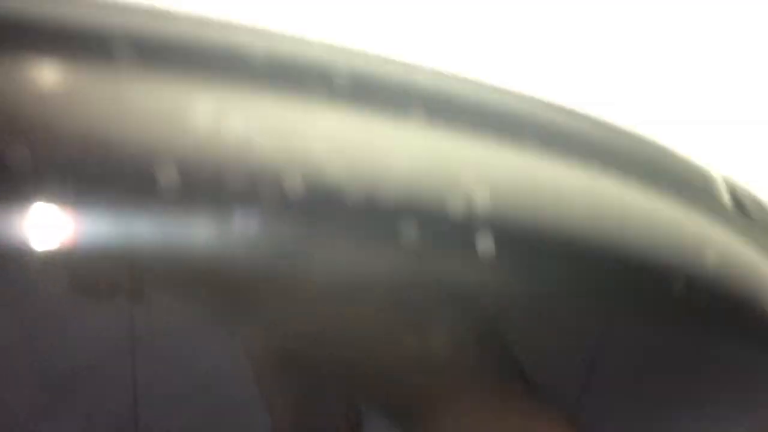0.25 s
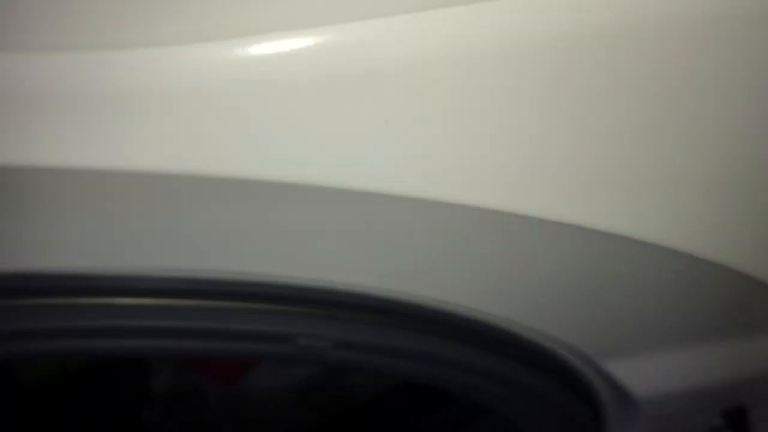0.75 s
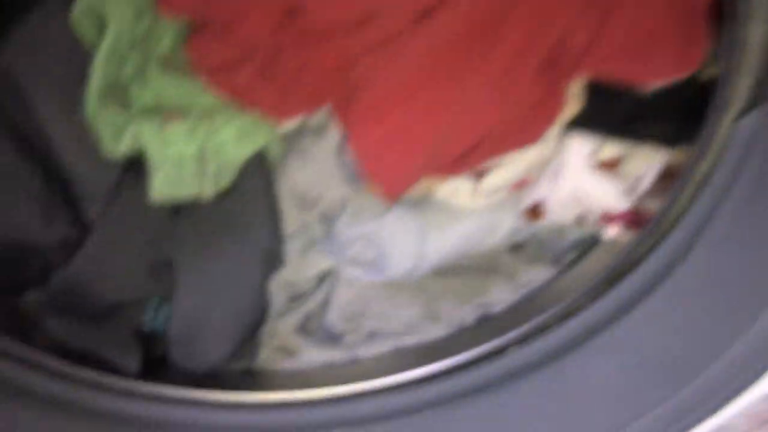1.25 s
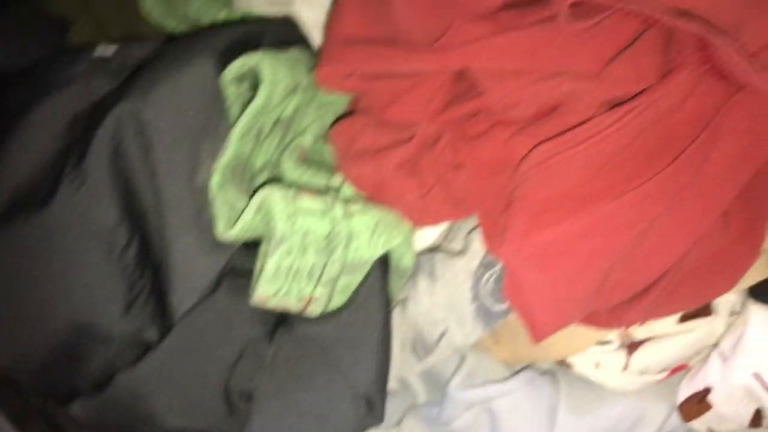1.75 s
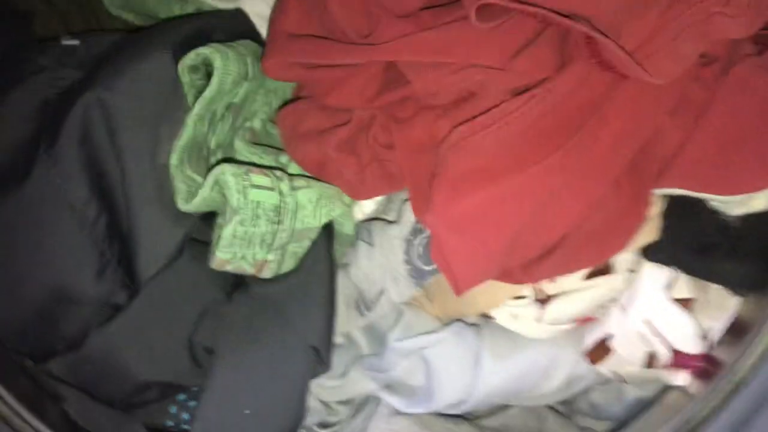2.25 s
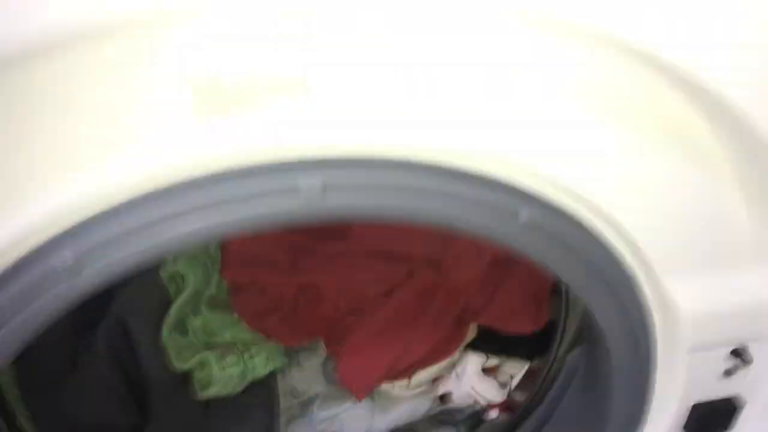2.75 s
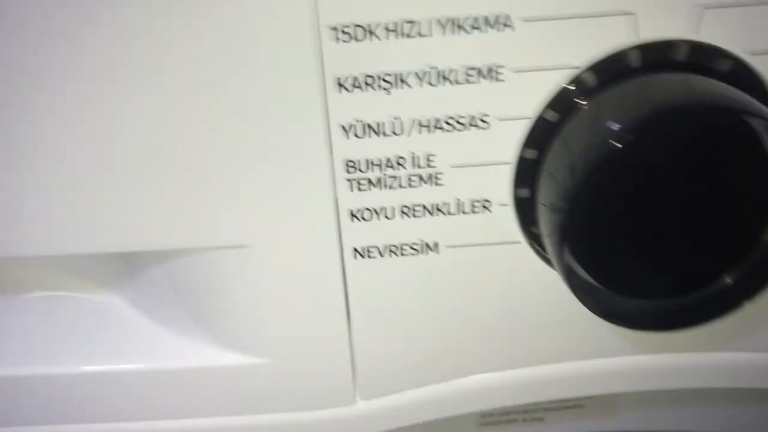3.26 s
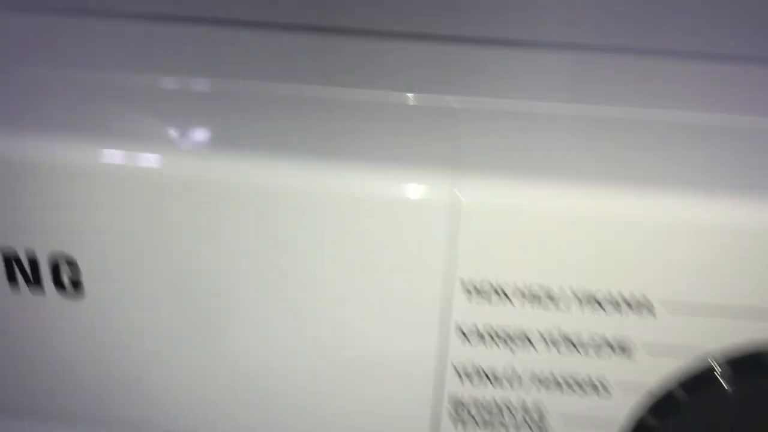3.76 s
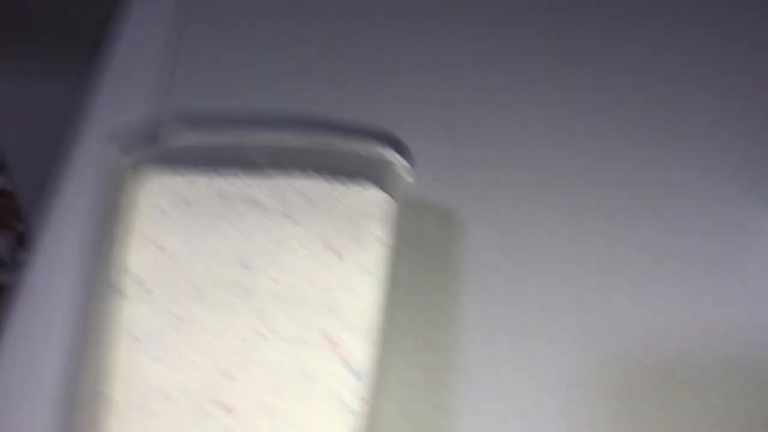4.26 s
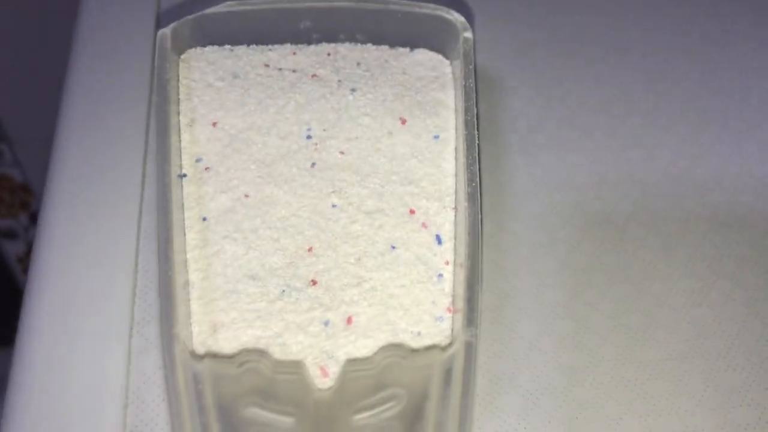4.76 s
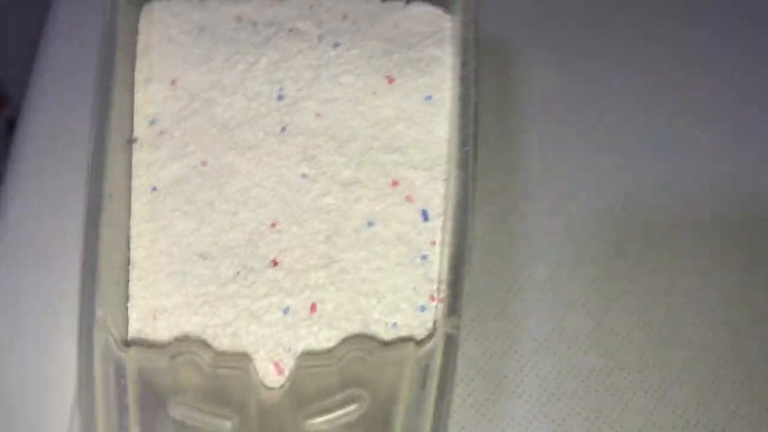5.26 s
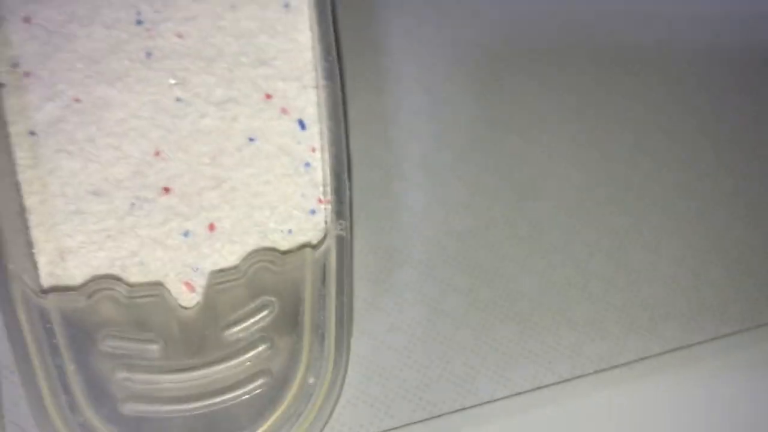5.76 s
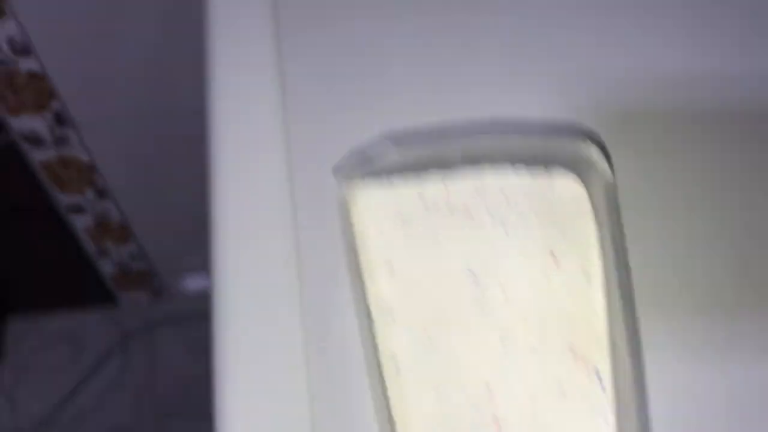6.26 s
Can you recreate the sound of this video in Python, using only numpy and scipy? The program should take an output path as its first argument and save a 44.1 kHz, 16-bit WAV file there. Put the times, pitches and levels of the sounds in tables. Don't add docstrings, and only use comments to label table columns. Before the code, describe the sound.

One close mono microphone catches light latch clicks, a brief rubbery creak and a loud hollow slam whose ring fades off tiles. A near-quiet stretch holds tiny ticks, cloth rustle and very faint hinge squeaks. Then a door thunk and a sharper shut, a cluster of hollow plastic knocks on resonant sheet metal, grainy powder whispers, and one firm bump before quiet.

```python
import sys
import numpy as np
from scipy import signal
from scipy.fft import rfft, irfft, next_fast_len
from scipy.io import wavfile
from scipy.ndimage import uniform_filter1d, map_coordinates

SR = 44100
rng = np.random.default_rng(int(sys.argv[2]) if len(sys.argv) > 2 else 0)


def generate_wav(sig):
    pcm = np.round(np.clip(np.atleast_2d(sig).T, -1, 1) * 32767).astype(np.int16)
    wavfile.write(sys.argv[1], SR, pcm)


def boost(x):
    u = np.asarray(x, float) / 20
    return 10 ** u


N = 286650

# (time [s], crack peak [dB], air re crack [dB], knock re crack [dB], knock pitch [Hz])
LATCH_CONTACTS = [(0.0164, -45, -3, 6.5, 687), (0.1689, -39, -17.5, 7.5, 900),
                  (0.2064, -48.5, -7.5, 2.5, 918), (0.2574, -58, -5.5, -7, 769),
                  (0.3042, -31.5, -8.5, -9, 1380), (0.306, -42, -17.5, 11.5, 715),
                  (0.4552, -42.5, -5.5, 3, 887), (0.481, -20.5, -10.5, -6, 659.5),
                  (0.5088, -35.5, 0, -3.5, 783), (0.528, -38, -6, -7, 942), (0.5455, -16, -19.5, -1.5, 670),
                  (0.5567, -29, -25.5, 7.5, 680), (0.581, -37, -16, 4.5, 821), (0.6065, -14, -5, -9, 858),
                  (0.6157, -7, -8.5, -5.5, 601), (0.6215, -12, -8.5, 5.5, 854.5),
                  (0.6314, -21, -19, 12.5, 802.7)]
# (time [s], crack [dB], air [dB], knock [dB], knock pitch [Hz])
TICK_CONTACTS = [(1.1364, -52, -6, 2, 670), (1.235, -60, -4, 12.5, 641), (1.4844, -61.5, 1, 11, 588.7),
                 (2.3156, -54.5, -10.5, -3, 932), (2.358, -57.5, -14, 5.5, 1218),
                 (2.3614, -61.5, -12.5, 9, 900), (2.366, -63.5, -12.5, 8, 640),
                 (2.5162, -53, -15.5, -18, 1101), (2.7467, -51, -13, -12, 761),
                 (2.7576, -47.5, -16.5, -24.5, 988), (2.9208, -50.5, 4.5, -10, 1500),
                 (3.2545, -47, -26.5, -19, 678), (4.1535, -45, -17.5, -22, 693)]
# (time [s], crack [dB], air [dB], knock [dB], knock pitch [Hz])
DOOR_CONTACTS = [(3.4027, -44.5, -3, 4, 1350), (3.4243, -53, -28, 4.5, 1710), (3.4463, -52, -3.5, 11, 1090),
                 (3.471, -26.5, -19.5, 7, 1020), (3.476, -36, -17.5, 14, 780), (3.5044, -35, -18, 7.5, 765),
                 (3.6292, -44, -16, 16.5, 890), (3.6606, -23, -12.5, -24.5, 1085),
                 (3.6652, -9, -6.5, -13.5, 1300), (3.6732, -14.5, -22.5, 2, 770),
                 (3.6832, -11.5, -26.5, -9, 990), (3.6874, -21.5, -17, 13.5, 750)]
# (time [s], crack [dB], air [dB], knock [dB], knock pitch [Hz])
SCOOP_CONTACTS = [(4.2472, -31, -14.5, 0, 1016), (4.2626, -29.5, -6.5, -3, 770),
                  (4.341, -45, -24.5, 3.5, 842), (4.3869, -41.5, -11, -1.5, 820), (4.3992, -53, -9, 9, 806),
                  (4.5467, -40.5, -18, 4.5, 880), (4.578, -35, -8.5, -6.5, 900),
                  (4.6128, -49.5, 1, -13.5, 800), (4.6434, -43.5, -7, -17, 933),
                  (4.6738, -45, -14, -7, 873), (4.6962, -30, -2, -0.5, 845), (4.7129, -27.5, -1, -2, 860),
                  (4.7264, -46, -17, 14, 824), (4.7724, -28, -13, 11, 693), (4.791, -17.5, -9, 3, 890),
                  (4.811, -40, -17.5, 18.5, 925)]
# (time [s], crack [dB], air [dB], knock [dB], knock pitch [Hz])
SLIDE_CONTACTS = [(5.1457, -38.5, -11.5, -1.5, 1040), (5.328, -47.5, -9.5, -2.5, 1224),
                  (5.3982, -52, -24, 2, 799), (5.4235, -50, -24, -3, 1700), (5.4925, -53, -17, 14.5, 920),
                  (5.5205, -19, -43, 5.5, 980), (5.697, -39.5, -8, -19, 994),
                  (6.119, -48.5, -4.5, -9, 1500), (6.1332, -64.5, 0, -2, 671)]
# (time [s], crack [dB], air [dB], knock [dB], knock
# pitch [Hz])
CHATTER_CONTACTS = [(0.3025, -40, -10.5, -11, 910), (0.376, -52.5, -11, 0.5, 910),
                    (0.385, -51, -12, 5.5, 905), (0.3965, -48.5, -11, 1, 980), (0.4045, -50, -11, 5, 1280),
                    (0.4068, -41.5, -12.5, 8.5, 726), (0.413, -43, -12.5, 7, 780),
                    (0.4305, -48, -10.5, 3.5, 850), (0.435, -43, -11.5, 1.5, 980),
                    (0.442, -42, -11, 4.5, 840), (0.4795, -39, -10, -2.5, 1400),
                    (0.5445, -32, -10.5, -9.5, 701), (3.4045, -49, -16, 13.5, 610),
                    (4.7035, -35.5, -12, 8, 1500), (4.7085, -41.5, -15, 7, 1580),
                    (4.7895, -26.5, -22, 0, 1700), (5.322, -51, -16, 6, 1130), (5.5165, -36, -20.5, 2, 916),
                    (5.525, -30.5, -35, 10, 900), (4.548, -49.5, -18.5, 5.5, 1480),
                    (4.7265, -33, -15, -3, 900), (0.1735, -46.5, -20, 10.5, 890),
                    (0.419, -47.5, -13.5, 0.5, 850), (3.6665, -24, -32.5, 10.5, 804)]
# (centre [Hz], width [Hz], level [dB])
LATCH_CRACK = [(1430, 140, 2.5), (2300, 480, -4), (3330, 470, -1.5), (4190, 260, 4.5), (6460, 2600, -3)]
# (centre [Hz], width [Hz], level [dB])
TICK_CRACK = [(4050, 980, 0), (5650, 700, 0.5), (7480, 1500, -4)]
# (centre [Hz], width [Hz], level [dB])
DOOR_CRACK = [(1500, 190, -1.5), (2052, 500, -4.5), (2720, 950, -4.5), (4430, 390, -2), (6120, 1750, -6.5)]
# (centre [Hz], width [Hz], level [dB])
SCOOP_CRACK = [(1490, 110, -0.5), (2250, 450, 0), (3200, 860, -1), (4310, 720, -1), (6530, 2030, -10)]
# (centre [Hz], width [Hz], level [dB])
TOUCH_CRACK = [(1480, 300, 0.5), (2659, 380, 2), (3300, 400, 2.5), (4285, 800, -1.5), (6500, 2300, -9)]
# (centre [Hz], width [Hz], level [dB])
AIR_MODES = [(7950, 3400, 1), (12590, 4600, -1.5), (15000, 1300, -0.5)]
# (multiple of knock pitch [1], width [Hz], level [dB])
HOLLOW_MODES = [(1, 97, 8.5), (1.65, 640, -11), (.62, 660, -10.5)]
# (time [s], peak [dB], strongest mode [Hz], ring scale of that mode [s])
PANEL_THUDS = [(0.015, -64.5, 245, 0.021), (0.306, -37.5, 323, 0.02), (0.483, -25, 340, 0.013),
               (0.55, -29, 330, 0.03), (0.61, -20.5, 252, 0.013), (0.696, -36, 216, 0.016),
               (1.498, -49.5, 287, 0.024), (1.825, -60.5, 295.2, 0.012), (2.049, -57.5, 237, 0.018),
               (2.358, -64.5, 242.7, 0.015), (3.402, -36, 193.7, 0.035), (3.403, -36.5, 413, 0.021),
               (3.478, -30, 188, 0.04), (3.512, -33.5, 190, 0.022), (3.572, -35.5, 170, 0.02),
               (3.616, -42, 175, 0.02), (3.685, -19.5, 246, 0.02), (4.256, -33.5, 210, 0.017),
               (4.358, -41, 233, 0.029), (4.702, -22.5, 310, 0.025), (4.724, -23.5, 261, 0.018),
               (4.768, -24.5, 300, 0.013), (4.7924, -17, 260, 0.012), (5.326, -34.5, 250, 0.013),
               (5.402, -37, 268, 0.026), (4.81, -28.5, 397, 0.023), (5.5193, -17.5, 240, 0.012),
               (6.117, -45, 212, 0.012)]
# (centre [Hz], width [Hz], level [dB])
PANEL_MODES = [(132, 240, -7.5), (215, 60, 3), (245, 59, -2.5), (280.9, 85, -5), (334, 51, -2),
               (386, 72, -2)]
# (frequency [Hz], t60 [s])
TILES_T60 = [(100, 0.99), (300, 0.96), (1000, 0.84), (3000, 0.94), (4500, 0.82), (6500, 0.68), (9000, .45),
             (12000, 0.47), (15000, .28)]
# (frequency [Hz], level [dB])
TILES_COLOUR = [(100, 9.5), (300, 5), (520, 4), (950, -1.5), (1700, -0.5), (3000, -1), (4400, -2),
                (6000, -2), (10000, 0.5), (15000, 0)]
# (frequency [Hz], density [dB per Hz])
QUIET_SPECTRUM = [(15, -43.5), (25, -8.5), (53, -4), (76, -7.5), (172, -15), (220, -27), (304, -18),
                  (378, -22), (568, -29.5), (616, -29.5), (978, -29.5), (2670, -34.5), (3150, -34),
                  (15200, -33), (16500, -47)]
# (frequency [Hz], amplitude [dB])
MOTOR_HUM = [(166.9, -75), (247.6, -76), (581.4, -81), (667.5, -87.5), (995.9, -86.5), (1420, -87.5)]
# (time [s], level [dB])
DOOR_SWING = [
    (0, -66),
    (.074, -91),
    (.11, -79),
    (.27, -70.5),
    (.44, -65),
    (.53, -40),
]
# (time [s], centre [Hz], width [Hz], level [dB rms], t60 [s])
BUZZ = [(0.85, 4100, 200, -36, .06), (0.547, 700, 100, -32, 0.12), (0.625, 4100, 300, -47, .85),
        (0.625, 1400, 150, -42.5, 0.55), (0.17, 2300, 810, -46.5, 0.093), (3.1, 5000, 120, -60.5, 0.19),
        (3.473, 1300, 250, -44, 0.2), (3.475, 1200, 100, -45, .25), (3.476, 780, 60, -42.5, .35),
        (3.686, 930, 100, -33, .25), (4.772, 1300, 530, -29, .08), (4.791, 1600, 390, -35.5, 0.23),
        (5.524, 930, 130, -46, 0.63), (4.8, 265, 170, -48, 0.99), (5.69, 5700, 900, -59, .1),
        (3.8, 730, 38, -41, 0.18), (3.69, 400, 40, -36.5, 0.57), (3.7, 1000, 70.6, -40, .15),
        (3.7, 740, 50, -42, .4), (0.557, 6900, 500, -46, .04), (0.571, 6900, 500, -48, .04),
        (0.581, 6900, 500, -46, .04), (4.808, 1000, 220, -31, .04), (6.12, 330, 110, -55.5, .45),
        (5.552, 8800, 700, -59, 0.0395)]
# (frequency [Hz], level [dB], t60 [s])
DRUM_MODES = [(54.4, -17, 1.7), (61.6, 0.5, 0.11), (121.7, -14.5, 0.42), (172.3, -32, 1.4),
              (230, -23, 0.73)]
# (frequency [Hz], level [dB], t60 [s])
FRONT_MODES = [(51.9, -8, 1.04), (75.4, -10, 1.67), (117.2, -2.5, 0.86), (190, -18.5, 0.35),
               (240, -24.5, 0.67), (363, -11.5, 0.82)]
# (frequency [Hz], level [dB], t60 [s])
LID_MODES = [(58.7, -11.5, 0.91), (74.9, -22.5, 0.52), (80.9, -12, 1.29), (145, -19.5, 1.03),
             (196, -5.5, 0.39), (209.8, -2.5, 0.32), (279, -10.5, 0.59), (271.6, -2, 0.38), (304, -7, 0.75),
             (337, -9, 0.4)]
# (time [s], level [dB], favoured mode [Hz], loss off it [dB/octave^2], free ring [s])
DRUM_BLOWS = [
    (0.555, -31.5, 57.23, 8, 3),
    (0.629, -10, 80.36, -1, 0.77),
]
# (time [s], level [dB], favoured mode [Hz], loss off it [dB/octave^2], free ring [s])
FRONT_BLOWS = [
    (2.071, -54, 69.6, 18, .2),
    (3.41, -35.5, 57.6, 8.4, 3),
    (3.478, -30.5, 63, 9, 3),
    (3.69, -25.5, 110, 0.78, 3),
    (4.274, -53, 68, 34, 3),
]
# (time [s], level [dB], favoured mode [Hz], loss off it [dB/octave^2], free ring [s])
LID_BLOWS = [
    (4.666, -25.5, 50, 19, 3),
    (4.792, -20.5, 145, 2, 3),
    (5.329, -42.5, 268, 8.7, 3),
    (5.523, -25.5, 168, 4.1, 3),
    (6.121, -56, 337, 9.1, 3),
    (6.18, -49, 54.6, 19.7, 3),
]
# (time [s], frequency [Hz], level [dB], t60 [s], free ring [s])
SINGLE_RINGS = [(0.29, 100, -49, 0.43, 3), (0.559, 92.5, -22, 0.67, 3), (0.62, 95, -8, 0.1, 2.6),
                (1.291, 91, -40.5, 0.068, 3.6), (0.647, 64.4, -28, .55, 3), (0.69, 216, -36, .4, 3),
                (1.495, 55, -53, 1.5, 0.08), (1.675, 56, -58.5, .7, 3.07), (6.12, 188.1, -54, .3, 2.94),
                (5.402, 259, -36, 0.13, .012), (5.424, 340, -37, .16, 3), (5.326, 263, -34, .2, .012),
                (5.66, 54, -46, 1.06, 3.2), (3.477, 95, -17.5, 0.14, 3), (3.687, 95, -13, 0.34, 0.12),
                (5.519, 100, -34.5, 0.6, 3), (6.128, 95, -50, 0.28, 3.4)]
# (time [s], level [dB])
SEAL_CREAK = [(.36, -81.5), (.378, -58), (.398, -51), (.41, -46.5), (.424, -53), (.438, -44), (.45, -53),
              (.47, -55)]
# (centre [Hz], width [Hz], level [dB])
SEAL_MODES = [(786, 150, 7.5), (1400, 260, 0), (2760, 390, -2), (3900, 900, -6), (6370, 1700, -31)]
# (peak time [s], rise [s], fall [s], level [dB], lowest frequency [Hz])
POWDER_SWELLS = [(.40, .034, 0.025, -59, 4900), (.44, 0.0096, 0.0066, -58, 5000),
                 (1.15, 0.027, 0.13, -64, 4860), (2.6, 0.2, 0.41, -83, 3985),
                 (2.94, 0.011, 0.094, -63.5, 5010), (4.74, 0.062, .15, -78.5, 8000),
                 (5.02, 0.13, 0.031, -67, 8900), (5.17, 0.27, 0.33, -67, 5800),
                 (5.47, 0.019, 0.11, -65, 3900), (5.68, .048, 0.067, -65, 7100)]
# (peak time [s], rise [s], fall [s], level [dB], lowest frequency [Hz])
CLOTH_SWELLS = [(1.2, .1, .12, -66, 458.7), (1.51, 0.026, 0.05, -65.5, 249.3),
                (2.42, 0.039, 0.084, -73, 703), (2.93, 0.034, 0.21, -71, 497),
                (3.28, 0.029, 0.15, -69.5, 2150), (4.73, 0.032, 0.035, -43, 437),
                (5.69, 0.0076, 0.02, -54.5, 1495), (5.34, 0.013, .03, -65, 600),
                (5.41, .012, 0.035, -64, 600), (5.48, .03, 0.038, -69, 900)]
# (peak time [s], half length [s], level [dB], pitch [Hz])
HINGE_SQUEAKS = [(1.985, 0.028, -71, 870), (1.7, 0.027, -78, 1000), (2.03, 0.015, -75, 990),
                 (2.6, .03, -77.5, 875), (2.265, 0.016, -74.5, 1200), (1.3, 0.035, -72, 1000),
                 (2.455, 0.015, -71.5, 870), (2.005, .018, -70, 980), (2.31, .015, -70.5, 840),
                 (2.88, .02, -73, 580), (2.805, .012, -74.5, 1550), (2.885, .012, -75, 1480),
                 (3, .01, -76, 3100)]
# (frequency [Hz], level [dB])
MIC_RESPONSE = [(3800, 0.5), (5000, -1.5), (6300, -0.5), (7800, -4.5), (9000, -2.5), (10500, -6.5),
                (12500, -0.5), (15500, -1)]

LOUD_DB, WETTER_DB_PER_DB, SHORTER_DB_PER_DB = -21.5, 0.11, 0.12
KNOCK_LAG_S = 0.0015
FAVOURED_WIDTH_HZ_S = 0.64
HISS_DB, RUMBLE_DB, RUMBLE_SWAY_DB = -65, -72, 1.3
CLOTH_SPAN, POWDER_TOP_HZ = 5.6, 15300
SQUEAK_SAG_HZ_PER_S = 400
MIC_TOP_HZ = 16050


def unit(x):
    return x / np.sqrt(np.mean(x ** 2) + 1e-20)


def along(points, hz):
    f, value = np.transpose(points)
    return np.interp(np.log(hz + 1), np.log(f + 1), value)


def gain_curve(rows):
    s, db = np.transpose(rows)
    return boost(np.interp(np.arange(N) / SR, s, db, left=-140, right=-140))


def wobble(rate_hz, size=N):
    knots = rng.standard_normal(int(N * rate_hz / SR) + 4)
    return map_coordinates(knots, [np.arange(size) * rate_hz / SR])


def filtered(x, response):
    n = x.shape[-1]
    m = next_fast_len(n + SR // 10)
    spectrum = rfft(x, m) * response(np.fft.rfftfreq(m, 1 / SR))
    return irfft(spectrum, m)[..., :n]


def resonant(modes):
    def response(f):
        total = 0
        for k, (hz, width_hz, db) in enumerate(modes):
            total = total + (-1) ** k * boost(db) * 1j * f * width_hz / (hz * hz - f * f + 1j * f * width_hz)
        return total
    return response


def quiet():
    noise = unit(filtered(rng.standard_normal(N), lambda f: boost(along(QUIET_SPECTRUM, f))))
    hiss = filtered(noise, lambda f: f ** 4 / (f ** 4 + 120 ** 4))
    rumble = unit(filtered(noise - hiss, resonant([(49.3, 12, 1), (95, 24, -12.5)])))
    swing = uniform_filter1d(gain_curve(DOOR_SWING), size=1500)
    sway = boost(RUMBLE_DB + RUMBLE_SWAY_DB * wobble(15))
    t = np.arange(N) / SR
    hum = np.zeros(N)
    for hz, db in MOTOR_HUM:
        hum += boost(db + 2.1 * wobble(11)) * np.sin(2 * np.pi * hz * t + 1.2 * wobble(14))
    return boost(HISS_DB) * hiss + rumble * (swing + sway) + hum


def burst(t60, response, rise=0.0011, push=0):
    t = np.arange(SR // 8) / SR
    rough = rng.standard_normal(len(t)) * boost(5.5 * rng.standard_normal(len(t)))
    decay = boost(-60 * t / np.clip(t60, .002, .2))
    rung = filtered((push + rough) * decay * (1 - np.exp(-t / rise)), response)
    return rung / np.abs(rung).max()


def tile_answer(near, room_db, blur):
    size = SR if np.abs(near).max() > boost(-33) else SR // 2
    hz, t, z = signal.stft(rng.standard_normal(size), SR, nperseg=512)
    uneven = unit(uniform_filter1d(rng.standard_normal(len(hz)), size=2))
    z *= boost(1.3 * uneven)[:, None]
    decay_db = along(TILES_COLOUR, hz)[:, None] - 60 * t / along(TILES_T60, hz)[:, None]
    tail = signal.istft(z * boost(decay_db), SR, nperseg=512)[1]
    power = np.cumsum(np.abs(rfft(near, 4 * len(near))) ** 2)
    grid_hz = np.fft.rfftfreq(4 * len(near), 1 / SR)

    def spectrum(f):
        width_hz = 12 + blur * f
        share = 0
        for k in (.5, 1.4, 4):
            above = np.interp(f + k * width_hz, grid_hz, power)
            below = np.interp(f - k * width_hz, grid_hz, power)
            share = share + np.abs(above - below) / (3 * k)
        return np.sqrt(share / (2 * width_hz) * grid_hz[1]) * boost(2.3 * wobble(1100, size=len(f)))

    tail = filtered(tail, spectrum)
    tail *= 1 - np.exp(-(np.arange(len(tail)) / SR / 0.0024) ** 2)
    return boost(room_db) * tail / np.sqrt(SR * 0.031)


def add(track, s, near, room_db, blur):
    heard = tile_answer(near, room_db, blur)
    heard[:len(near)] += near
    start = round(s * SR)
    track[start:start + len(heard)] += heard[:len(track) - start]


def thuds(room_db):
    track = np.zeros(N)
    for s, db, hz, t60 in PANEL_THUDS:
        favoured = resonant([(hz, FAVOURED_WIDTH_HZ_S / t60, 0)])

        def soft(f):
            modes = boost(-9.5) * resonant(PANEL_MODES)(f) + favoured(f)
            return modes / (1 + 1j * f / 600) ** 2 * (1j * f / (150 + 1j * f)) ** 2

        near = boost(db - 3.5) * burst(0.0075, soft, rise=0.0012, push=2.2)
        add(track, s, near, room_db + .05 * (LOUD_DB - db), blur=0.2)
    return track


def contacts(rows, crack_modes, loud_t60, room_db, blur):
    track = np.zeros(N)

    def steep_air(f):
        return resonant(AIR_MODES)(f) * (f / 8000) ** 2 / (1 + (f / 8000) ** 2)

    for s, db, air_db, knock_db, knock_hz in rows:
        t60 = loud_t60 * boost(SHORTER_DB_PER_DB * min(db - LOUD_DB, 0))
        body = resonant([(k * knock_hz, width_hz, level) for k, width_hz, level in HOLLOW_MODES])
        hollow = lambda f: body(f) * np.exp(-2j * np.pi * f * KNOCK_LAG_S)
        crack = burst(t60, resonant(crack_modes))
        air = boost(air_db + 7.5) * burst(0.49 * t60, steep_air)
        knock = boost(knock_db) * burst(0.44 * t60, hollow, rise=0.002)
        near = boost(db - 0.5) * (crack + air + knock)
        add(track, s, near, room_db + WETTER_DB_PER_DB * (LOUD_DB - db), blur)
    return track


def buzzing():
    track = np.zeros(N + SR)
    t = np.arange(SR) / SR
    for s, hz, width_hz, db, t60 in BUZZ:
        mode = resonant([(hz, width_hz, 0)])
        band = unit(filtered(rng.standard_normal(SR), lambda f: mode(f) ** 2))
        track[round(s * SR):][:SR] += boost(db - 60 * t / t60) * (1 - np.exp(-t / .002)) * band
    return track[:N]


def cabinet():
    rings = list(SINGLE_RINGS)
    for modes, blows in [(DRUM_MODES, DRUM_BLOWS), (FRONT_MODES, FRONT_BLOWS), (LID_MODES, LID_BLOWS)]:
        for s, db, spot_hz, spot_db, free_s in blows:
            for hz, level_db, t60 in modes:
                off_spot_db = spot_db * np.log2(hz / spot_hz) ** 2
                rings.append((s, hz, db + level_db - off_spot_db, t60, free_s))
    track = np.zeros(N)
    for s, hz, db, t60, free_s in rings:
        start = round(s * SR)
        t = np.arange(min(N - start, round(1.2 * t60 * SR))) / SR
        fade_db = -60 * t / t60 - 60 * np.clip(t - free_s, 0, None) / 0.18
        level = boost(db + fade_db + 1.1 * wobble(hz / 7, size=len(t)))
        onset = 1 - np.exp(-t * hz / 0.81)
        track[start:start + len(t)] += level * onset * np.sin(2 * np.pi * hz * t)
    return track


def grains(rate_hz, spread_db):
    chance, size = rng.random((2, N))
    return (chance < rate_hz / SR) * boost(-spread_db * np.log(size + .02)) * rng.standard_normal(N)


def seal_creak():
    slips = unit(filtered(grains(rate_hz=1500, spread_db=0.0), resonant(SEAL_MODES)))
    return slips * gain_curve(SEAL_CREAK) * boost(2.1 * wobble(66))


def rustle():
    track = np.zeros(N)
    fine = grains(rate_hz=8100, spread_db=2.5) * boost(1.2 * wobble(22.94))
    swells = [(*row, POWDER_TOP_HZ) for row in POWDER_SWELLS]
    swells += [(*row, CLOTH_SPAN * row[-1]) for row in CLOTH_SWELLS]
    for s, rise, fall, db, low_hz, high_hz in swells:
        start = max(round((s - 3 * rise) * SR), 0)
        stop = min(round((s + 3 * fall) * SR), N)
        t = np.arange(start, stop) / SR - s
        band_pass = lambda f: 1 / (1 + (low_hz / (f + 1)) ** 5) / (1 + (f / high_hz) ** 6)
        band = unit(filtered(fine[start:stop], band_pass))
        track[start:stop] += boost(db) * band * np.exp(-(t / np.where(t < 0, rise, fall)) ** 2)
    return track


def squeaks():
    track = np.zeros(N)
    t = np.arange(-(SR // 8), SR // 8) / SR
    for s, half_s, db, hz in HINGE_SQUEAKS:
        phase = 2 * np.pi * (hz - SQUEAK_SAG_HZ_PER_S * t / 2) * t + 1.3 * wobble(70, size=len(t))
        level = boost(db + 3.5 * wobble(80, size=len(t))) * np.exp(-(t / half_s) ** 2)
        track[round(s * SR) - SR // 8:][:len(t)] += level * np.sin(phase)
    return track


def scene():
    mix = quiet() + thuds(room_db=-7.5)
    mix += contacts(LATCH_CONTACTS, LATCH_CRACK, loud_t60=0.04, room_db=-12.0, blur=0.16)
    mix += contacts(CHATTER_CONTACTS, TOUCH_CRACK, loud_t60=0.013, room_db=-14.5, blur=0.12)
    mix += contacts(TICK_CONTACTS, TICK_CRACK, loud_t60=0.015, room_db=-8, blur=0.19)
    mix += contacts(DOOR_CONTACTS, DOOR_CRACK, loud_t60=0.034, room_db=-8.0, blur=0.097)
    mix += contacts(SCOOP_CONTACTS, SCOOP_CRACK, loud_t60=0.029, room_db=-9.5, blur=0.12)
    mix += contacts(SLIDE_CONTACTS, SCOOP_CRACK, loud_t60=0.026, room_db=-10.0, blur=0.12)
    mix += buzzing() + cabinet() + seal_creak() + rustle() + squeaks()
    return mix[None]


def low_pass(x):
    return signal.sosfilt(signal.butter(12, 16640, fs=SR, output="sos"), x)


def record(dry):
    def microphone(f):
        bass_cut = ((1j * f / 44) ** 2 / (1 + .9j * f / 44 - (f / 44) ** 2)) ** 2
        top_loss_db = 30 / (1 + (MIC_TOP_HZ / (f + 1)) ** 150)
        return bass_cut * (f < 1.037 * MIC_TOP_HZ) * boost(along(MIC_RESPONSE, f) - top_loss_db)

    return low_pass(filtered(dry, microphone))


dry = scene()
out = record(dry)
generate_wav(out)
```